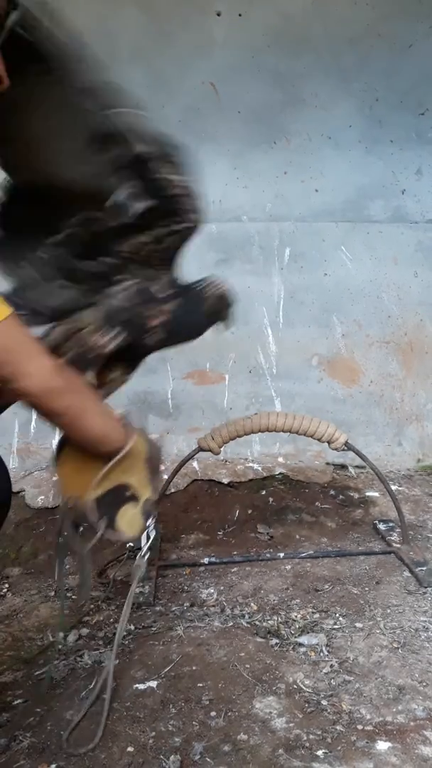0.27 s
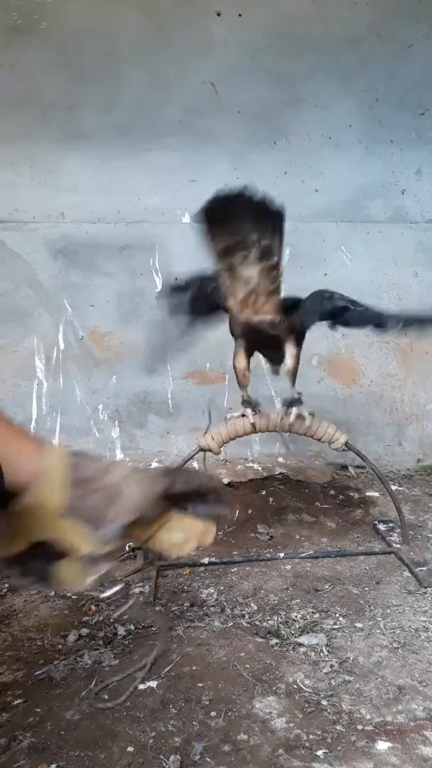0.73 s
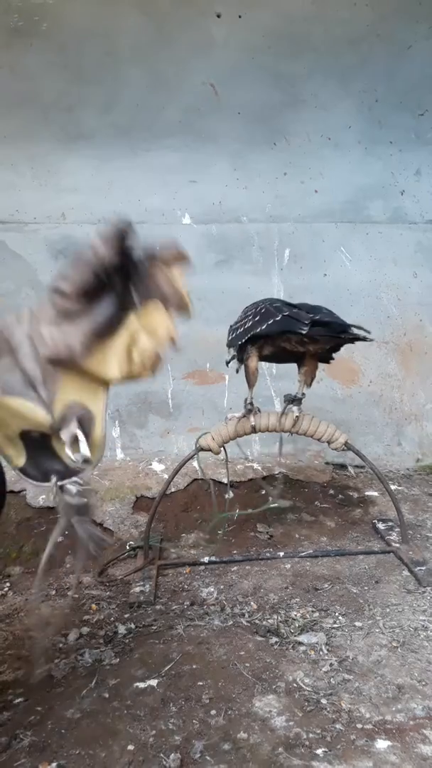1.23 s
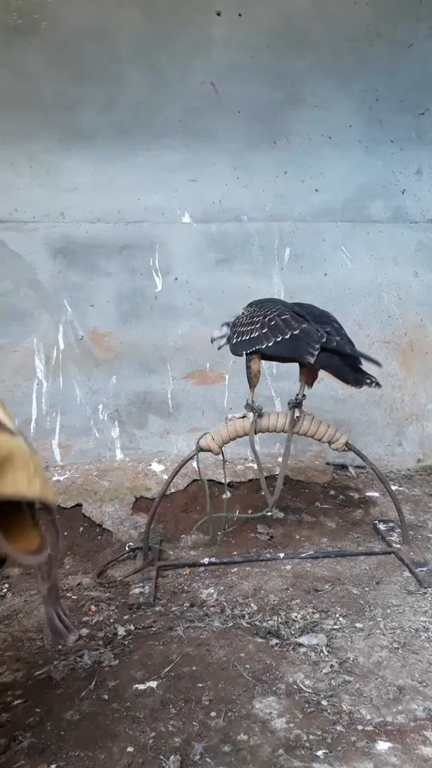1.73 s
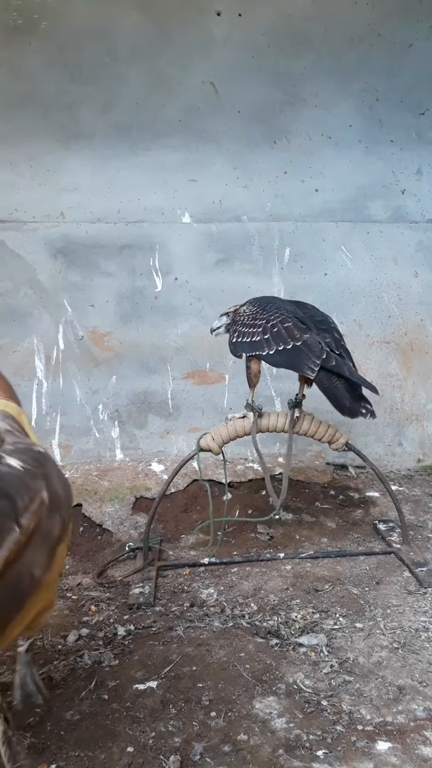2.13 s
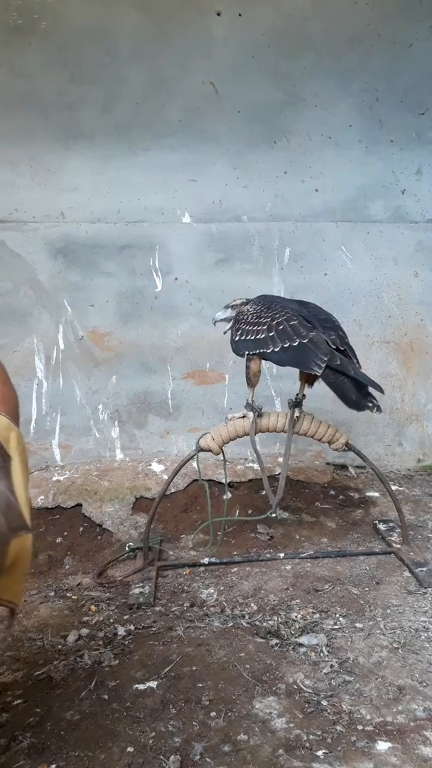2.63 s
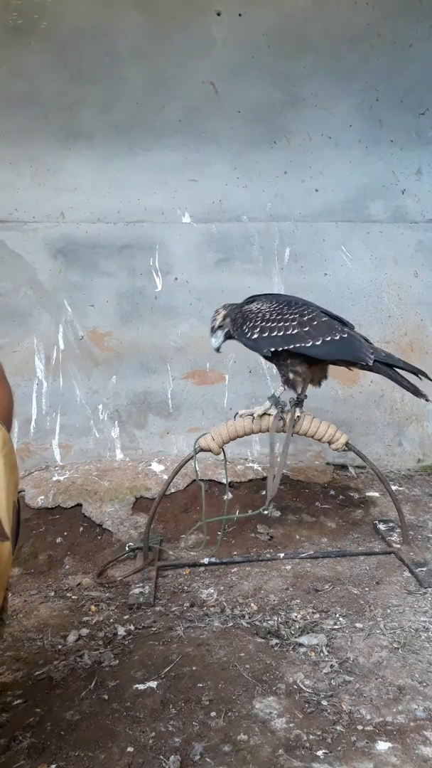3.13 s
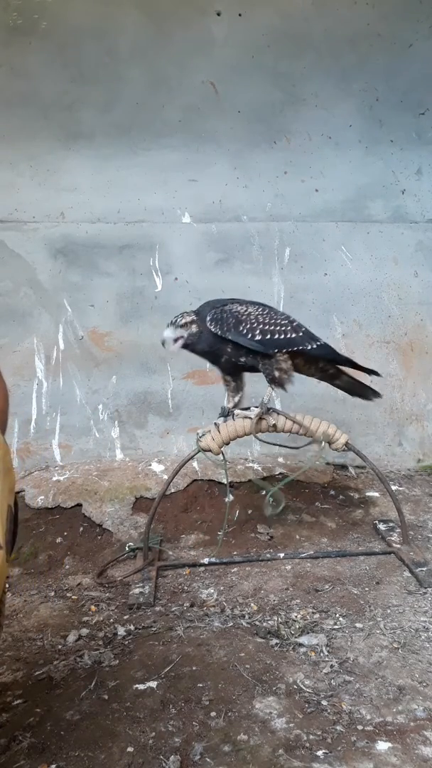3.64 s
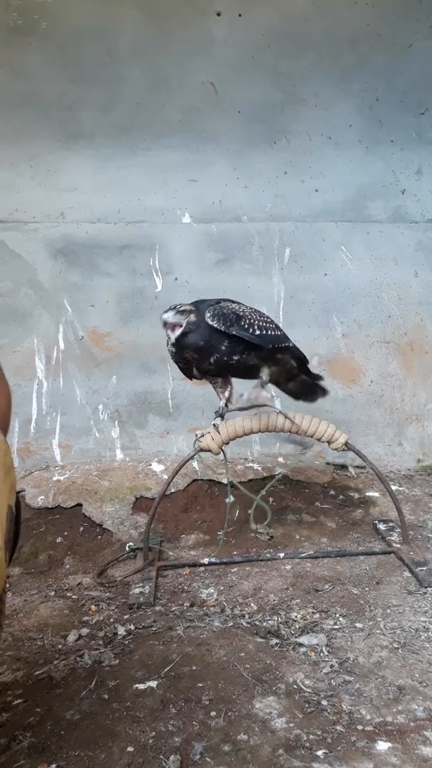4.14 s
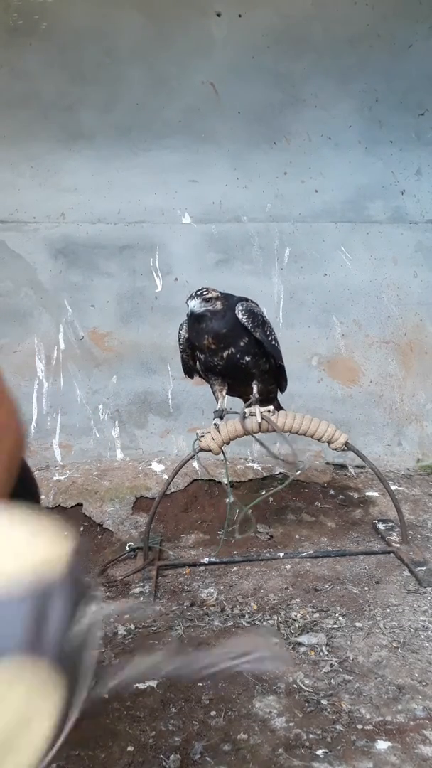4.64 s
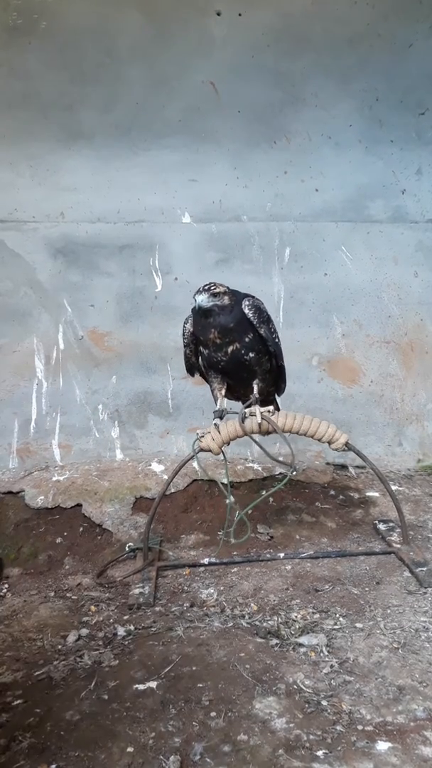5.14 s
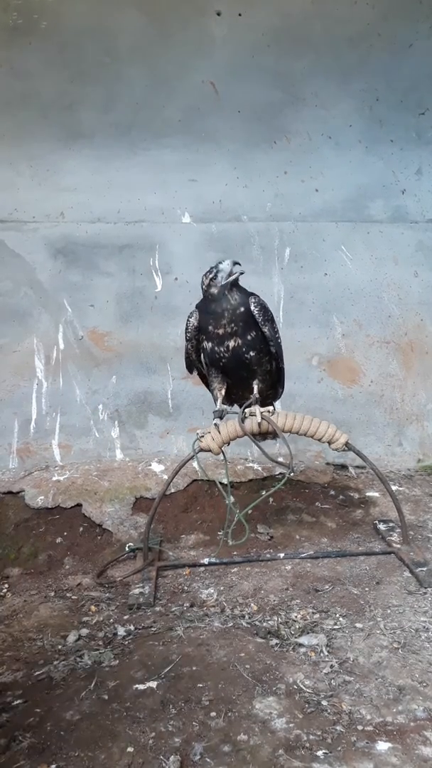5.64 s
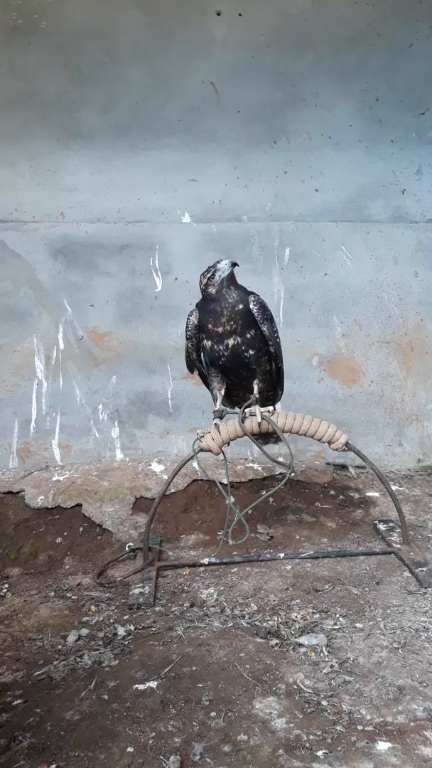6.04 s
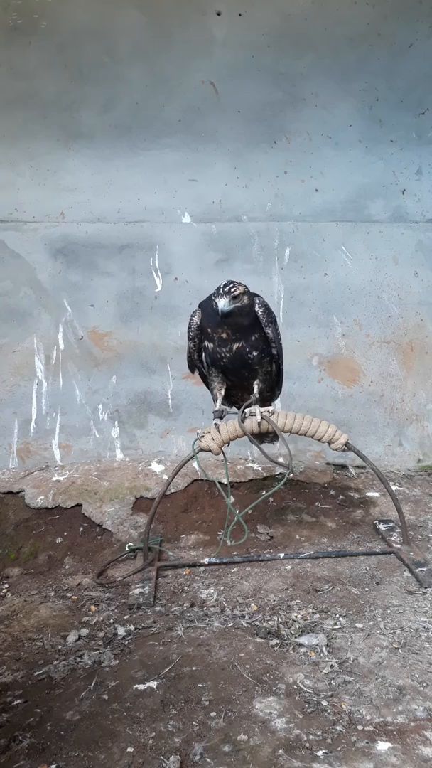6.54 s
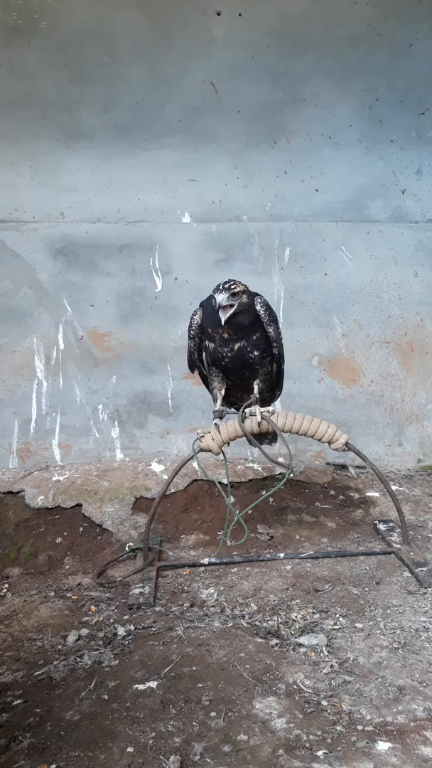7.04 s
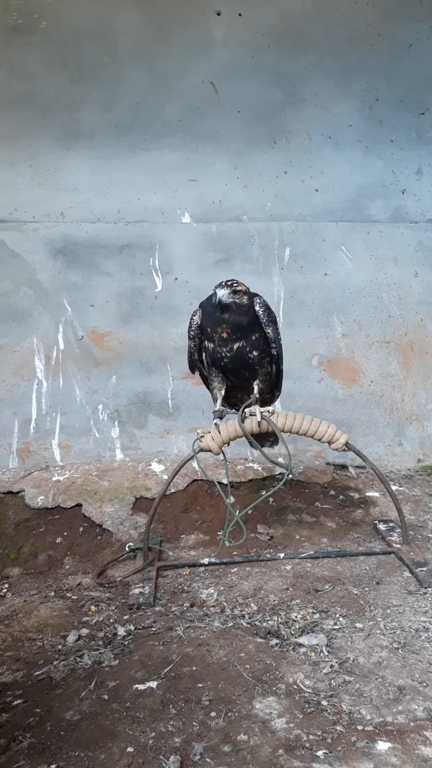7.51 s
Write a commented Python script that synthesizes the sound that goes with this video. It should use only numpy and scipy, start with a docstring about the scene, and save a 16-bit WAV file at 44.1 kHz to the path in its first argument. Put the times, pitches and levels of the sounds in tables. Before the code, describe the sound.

A young eagle begs loudly in a pen whose hard walls add a short echo, over a faint outdoor hum. Each call is a hiss with a high whistle that plunges and breaks up, then a clear, short yelp, sometimes raspy. The yelps fall at about 0.2, 0.7, 1.3, 2.0, 2.8, 3.6 and 4.2 seconds; all but the first are led by a quick rising squeak. Soft wing beats rustle from 0.3 to 1 second, then talons tick on the perch and a leash swivel jingles thinly until 1.7. Near 4.4 the bird shakes its feathers, with another faint jingle. From 4.6 to 7 seconds the handler scuffs and knocks lightly about. Two more calls with weaker hisses come at 5.7 and 7.0, the last with a low, rough undertone. A soft low rumble follows at around 7.5 seconds.

```python
"""A young eagle flaps from a glove to its perch in a walled pen, its leash jingling, and begs nine times.
Each call is a hiss whose whistle plunges and breaks up, then a clear yelp, sometimes with a low rasp.
Calls two to seven open with a rising squeak. After the seventh the bird shakes its feathers and the
handler scuffs and knocks about. The last yelp has a low, rough undertone, and a soft rumble follows.
All along, the hard walls echo over a faint outdoor hum."""
import sys
import numpy as np
from scipy import signal
from scipy.fft import rfft, irfft, next_fast_len
from scipy.io import wavfile
from scipy.ndimage import uniform_filter1d, minimum_filter1d, map_coordinates

SR = 44100
rng = np.random.default_rng(int(sys.argv[2]) if len(sys.argv) > 2 else 0)


def unload_audio(sound):
    """Save the sound as a 16-bit wav file, at the path given as the first command line argument."""
    columns = np.transpose(np.atleast_2d(sound))
    # keep every value between -1 and 1, then stretch to whole-number steps
    steps = np.round(np.clip(columns, -1, 1) * 32767)
    wavfile.write(sys.argv[1], SR, steps.astype(np.int16))


N = 342657
T = np.arange(N) / SR

# Levels in all tables are relative. A harmonic is a tone at a whole multiple of the pitch.
# the yelps: start/s, length/s, pitch/Hz, glide/(Hz per s), final sag/Hz, pitch jitter/share,
# harmonics 1 to 4/dB (four columns), climax after the start/s, climax width/s, rasp/dB, rasp length/s
YELPS = [(0.23, 0.11, 1824, -900, 30, 0.0071, -21.5, -14, -26.5, -37, .038, 0.023, -41.5, .03),
         (0.735, .11, 1780, -700, 3.5, .007, -21, -21, -32.5, -43, 0.036, .022, -45.5, 0.048),
         (1.336, 0.12, 1916, -150, 158, 0.0055, -22.5, -5, -28, -41.5, 0.048, 0.0067, -36, 0.039),
         (2.035, 0.14, 1928, 151.5, 175, 0.0028, -21.5, -5, -24, -42, 0.067, 0.012, -29, 0.055),
         (2.823, 0.14, 1866, 797, 97.5, .004, -23.5, -8.5, -28.5, -39.5, 0.041, 0.014, -24, 0.038),
         (3.613, .118, 1857, -1100, 154, 0.014, -27, -20.5, -36.5, -44, 0.029, 0.024, -25.5, 0.08),
         (4.236, .14, 1843, -400, 98, 0.0063, -25.5, -13.5, -28.5, -36, 0.045, 0.043, -25, 0.078),
         (5.716, 0.096, 1669, -1400, 38, 0.011, -17, -19, -31, -36.5, 0.054, 0.022, -26.5, 0.024),
         (7.005, 0.15, 1923, -250, 196.5, 0.0046, -24, -17, -30.5, -35, 0.1, .045, -20.5, 0.077)]
# tone colour of air rushing through the open beak: f/Hz, level/dB
BEAK = [(700, -49), (1500, -29.5), (2300, -17.5), (3000, -13), (4000, 2.5), (5500, 3.5), (6800, -0.5),
        (9000, -5), (12000, -8), (15500, -16.5)]
# tone colour of the husky noise in a forced whistle: f/Hz, level/dB
HUSK = [(2500, -34.5), (3100, -6), (4300, 13.5), (6000, -8.5), (7000, -4.5), (9000, -17), (13000, -23.5)]


def yelps(attack_s=.029, release_s=.0081, lead_s=.008, lock_s=.0143, bloom_s=.023, shimmer_db=3):
    """The bird's voice box locks onto a note that sags and dulls as effort fades; uneven cycles rasp."""
    overtones = [(5, -10.5), (6, -16), (7, -18), (8, -18), (9, -11)]  # high harmonics: multiple of the pitch, level against the fourth/dB
    rasp_tones = [(.5, -8.5), (1.5, -1), (2.5, -5.5), (3.5, -14.5), (4.5, -13.5), (5.5, -16), (6.5, -20.5),
                  (7.5, -25.5)]  # tones from an octave below upward: multiple of the pitch, level/dB
    puff_colour = [(500, -21.5), (1000, 2), (1800, 0.5), (3500, 0), (5500, -9), (8500, -12), (14000, -18.5)]  # the puff of noise as the note catches: f/Hz, level/dB
    fade_from, rasp_peak = .55, .43  # shares of the yelp's length and of the rasp's length
    out = np.zeros(N)
    for start, length, hz, glide, sag, jitter, *colour in YELPS:
        first, second, third, fourth, climax, width, rasp_db, rasp_s = colour
        t = clock(length + lead_s) - lead_s
        n, age = len(t), np.maximum(t, 0)
        fading = np.clip((t / length - fade_from) / (1 - fade_from), 0, 1) ** 1.5
        pitch = hz + glide * (t - .05) - sag * fading
        angle = phase(pitch * (1 + jitter * wobble(500, n) + .014 * fading * wobble(110, n)))
        dull_db = 27.5 * fading ** 2
        first_db = first - 5 * np.exp(-age / bloom_s)  # the lowest harmonic grows in slowly
        climax_bump = np.exp(-((t - climax) / width) ** 2 / 2)
        second_db = second - 11.5 * (1 - climax_bump) - dull_db
        upper = [(3, third), (4, fourth)] + [(k, fourth + db) for k, db in overtones]
        harmonics = [(1, first_db), (2, second_db)]
        harmonics += [(k, db - dull_db - 6.5 * np.exp(-age / lock_s)) for k, db in upper]
        clear = sum(amp(db + shimmer_db * wobble(200, n)) * np.sin(round(k) * angle)
                    for k, db in harmonics)
        loose_angle = angle + .097 * wobble(600, n)
        rasp = sum(amp(db) * np.sin(round(2 * k) / 2 * loose_angle) for k, db in rasp_tones)
        rasp *= amp(rasp_db) * swell(t + lead_s, rasp_peak * rasp_s + lead_s,
                                     (1 - rasp_peak) * rasp_s, shape=1.2)
        air = amp(second_db - 30) * noise(BEAK, n)
        puff = amp(-34) * swell(t + lead_s, rise=.01, fall=.035) * noise(puff_colour, n)
        loudness = amp(-1) * gate(t + lead_s, attack_s, release_s)
        add(out, start - lead_s, loudness * (np.sqrt(2) * (clear + rasp) + air) + puff)
    return out


def hisses(plunge_hz=4000, lowest_hz=3150, settle_s=.026, plunge_s=.025, break_s=.023):
    """Air hisses through the beak; its whistle settles, plunges and breaks into a rough scream."""
    # the hiss before each yelp: start/s, plunge time/s, hiss/dB, held whistle/dB, plunge/dB,
    # scream/dB, first pitch/Hz, held pitch/Hz
    breaths = [(0.062, 0.206, -35.5, -39, -14, -19.5, 4500, 5696),
               (0.57, 0.713, -43, -33, -16, -19.5, 3956, 5447),
               (1.213, 1.317, -41, -36, -18, -27.5, 5900, 5900),
               (1.874, 2.013, -40, -42, -17.5, -20, 6130, 6120),
               (2.698, 2.798, -40, -38.5, -19.5, -23, 6100, 5890),
               (3.503, 3.576, -41.5, -37, -20.5, -24.5, 6194, 6054),
               (4.112, 4.208, -34, -45, -16, -29.5, 6010, 6020),
               (5.482, 5.685, -57, -47, -28, -28.5, 3704, 5135),
               (6.882, 6.962, -53.5, -47, -28.5, -31, 5670, 5906)]
    scream_colour = [(500, -28), (900, -10), (1400, -2.5), (1850, 5), (2300, -11.5), (3100, 8), (4300, 14),
                     (6000, -31), (9000, -16), (11000, -49)]  # the voice breaking: f/Hz, level/dB
    attack_s, release_s, overlap_s = .012, .01197, .0189  # each hiss runs on into its yelp
    out = np.zeros(N)
    for row, yelp in zip(breaths, YELPS):
        start, plunge, hiss_db, held_db, plunge_db, scream_db, first_hz, held_hz = row
        t = clock(yelp[0] + overlap_s - start + attack_s)
        n, since = len(t), t + start - attack_s / 2 - plunge  # "since" is 0 at the plunge
        fall = np.exp(since / plunge_s)
        push = np.minimum(fall, 1)
        held = held_hz + (first_hz - held_hz) * np.exp(-t / settle_s)
        hz = np.maximum(held * (plunge_hz / held_hz) ** fall, lowest_hz)
        flow_db = np.interp(since, [since[0], 0, since[-1]], [-3, 3.5, -3])
        flow = amp(flow_db + 1.5 * wobble(70, n))
        burst = amp(plunge_db + np.minimum(750 * since, -380 * since))  # loudest at the plunge
        extra_air_db = hiss_db + 35
        rough = .065 * np.sqrt(amp(extra_air_db)) * (1 - .3 * push)  # more air roughens the whistle
        bright_db = 3 - 8 * push - .35 * extra_air_db  # less air leaves it richer in overtones
        tone = np.hypot(flow * amp(held_db), burst) * whistle(hz, rough, bright_db)
        scream = unit(noise(scream_colour, n) * amp(5 * wobble(450, n)))
        scream *= np.clip(since / break_s, 0, 1) * amp(scream_db - 4.5)
        air = flow * amp(hiss_db) * noise(BEAK, n)
        husk = burst * amp(-8) * noise(HUSK, n)
        add(out, start - attack_s / 2, gate(t, attack_s, release_s) * (air + tone + scream + husk))
    return out


def squeaks():
    """A quick upward whistle that turns husky as it rises."""
    rises = [(0.45, 0.068, 2677, 5953, -24), (1.042, .061, 2856, 6290, -30),
             (1.748, 0.062, 2894, 6260, -29.5), (2.544, 0.056, 2850, 5993, -31.5),
             (3.332, .051, 2880, 4857, -47.5), (3.945, .05, 2805, 6140, -26.5)]  # the squeaks: start/s, length/s, first pitch/Hz, last pitch/Hz, level/dB
    out = np.zeros(N)
    for start, length, first_hz, last_hz, db in rises:
        progress = np.linspace(0, 1, round(length * SR))
        hz = first_hz * (last_hz / first_hz) ** (progress ** .94)
        tone = whistle(hz, rough=.018 + .085 * progress, bright_db=-1)
        husk = 2 * progress ** 2 * amp(-2) * noise(HUSK, len(progress))
        arch = np.abs(np.sin(np.pi * progress)) ** 1.1
        add(out, start, amp(db) * arch * (tone + husk))
    return out


def whistle(hz, rough, bright_db, flutter_db=4, surge_db=2):
    """An airy whistle: swirling air frays its pitch and makes it waver."""
    n = len(hz)
    fray = rough * (wobble(1500, n) + .41 * wobble(130, n))
    angle = phase(hz * (1 + fray + .014 * wobble(70, n)))
    overtones = amp(-14) * np.sin(2 * angle) + amp(-24) * np.sin(3 * angle)
    tone = np.sin(angle) + amp(bright_db) * overtones
    return unit(tone * amp(flutter_db * wobble(500, n) + surge_db * wobble(60, n)))


def knocks(ring_s=.075, thump_hz=210, thump_s=.046, clatter_s=.19):
    """The handler steps and bumps about: a firm push, a short ring, a low thump and a spray of grit."""
    hits = [(0.349, -47, 1220, -46, -38), (4.651, -27.5, 259, -26, -33), (5.233, -22, 589, -31.5, -36),
            (5.328, -24, 429, -31, -42), (5.57, -36.5, 251, -45, -52), (5.684, -18.5, 252, -28, -44),
            (6.231, -30, 302, -46, -34), (6.343, -37, 976, -48, -42), (6.537, -18.5, 664, -54, -39),
            (6.616, -34, 294, -62, -42.5), (6.736, -27.5, 596, -39, -35.5), (6.756, -28, 596, -57, -39.5),
            (6.953, -28, 1110, -39, -33)]  # steps and knocks: t/s, ring/dB, ring pitch/Hz, thump/dB, clatter/dB
    # tone colour of the spray: f/Hz, level/dB
    grit = [(80, -48), (250, 0), (700, 9), (1550, 4), (2100, -25), (4000, -17.5), (12000, -36)]
    out, t = np.zeros(N), T[:SR // 5]
    contact = (1 - np.exp(-t / .0012)) * (1 + np.exp(-t / .005))
    for start, db, hz, thump_db, clatter_db in hits:
        ring = die_away(t, db - 5, ring_s) * np.sin(phase(hz * (1 + .031 * wobble(490, len(t)))))
        thump = die_away(t, thump_db + 1, thump_s) * np.sin(2 * np.pi * thump_hz * t)
        spray = die_away(t, clatter_db - 1, clatter_s) * noise(grit, len(t))
        add(out, start, (ring + thump + spray) * contact)
    # small things give off no deep bass
    return signal.sosfilt(signal.butter(2, 130, "highpass", fs=SR, output="sos"), out)


def scuffs_and_undertone(grain_db=3):
    """Grainy swells: soles, glove and leash drag; the last is the final yelp's low, rough undertone."""
    swells = [(.5, 0.21, 0.19, -46, 601), (1.53, .015, 0.1246, -38.5, 1284), (1.62, .06, 0.11, -46.5, 1202),
              (2.6, 0.29, 0.37, -46.5, 722.6), (4.6, 0.18, 0.85, -50, 951), (5.2, 0.031, 0.075, -36.5, 630),
              (5.285, 0.043, 0.039, -32, 450), (5.34, 0.076, 0.092, -37.5, 700),
              (6.97, 0.043, 0.14, -39, 803)]  # scuffs, then the undertone: start/s, rise/s, fall/s, level/dB, centre/Hz
    # tone colour of the broad noise: f/Hz, level/dB
    broad = [(90, -26.5), (250, 0), (700, 3.5), (1550, 4.5), (2200, -22), (3800, -11), (12000, -35.5)]
    out = np.zeros(N)
    for start, rise, fall, db, hz in swells:
        t = clock(rise + fall)
        n, angle = len(t), 2 * np.pi * hz * t
        band = wobble(600, n) * np.sin(angle) + wobble(600, n) * np.cos(angle)
        grainy = unit((band + amp(-4) * noise(broad, n)) * amp(grain_db * wobble(150, n)))
        add(out, start, amp(db - 2) * swell(t, rise, fall, shape=1.1) * grainy)
    return out


def rustles_and_ticks(grain_db=3, tick_s=.01):
    """The bright top of the first call's hiss, then sliding feathers; talons and leash swivel tick."""
    # top of the first hiss, then wing beats, last a shake: start/s, rise/s, fall/s, rustle/dB, sizzle/dB
    swells = [(0.051, .08, .17, -61.5, -45), (.34, .025, .08, -44.5, -49), (.53, .04, .07, -48, -48.5),
              (.6, .09, .19, -41.5, -49), (0.799, .1, .3, -63, -64.5), (4.38, .1, .21, -43.5, -60.5)]
    rustle_colour = [(200, 0), (600, -1), (1400, 8.5), (2100, -8), (4000, -1.5), (6500, -2), (10000, -18),
                     (15000, -16)]  # tone colour of the rustle: f/Hz, level/dB
    ticks = [(0.9339, -48), (0.9567, -27.5), (1.018, -40), (1.0544, -46), (1.6514, -44.5), (1.6784, -49),
             (2.188, -42), (3.3292, -36.5), (4.866, -47), (4.9891, -40), (5.123, -46), (5.1634, -41.5),
             (5.1885, -47.5)]  # taps of talons and swivel: t/s, level/dB
    # tone colour of sizzle and ticks: f/Hz, level/dB
    fine = [(2000, -16), (6000, -1.5), (9000, 7), (10500, -6.5), (14500, 0)]
    out = np.zeros(N)
    for start, rise, fall, rustle_db, sizzle_db in swells:
        t = clock(rise + fall)
        n = len(t)
        rush = amp(rustle_db - 1) * noise(rustle_colour, n) + amp(sizzle_db - 2) * noise(fine, n)
        grain = unit(amp(grain_db * wobble(300, n)))
        add(out, start, swell(t, rise, fall, shape=.84) * rush * grain)
    t = T[:SR // 20]
    for start, db in ticks:
        add(out, start, die_away(t, db - 8, tick_s) * noise(fine, len(t)))
    return out


def swivel(touches_per_s=14, ring_hz=14300, ring_s=.008, scatter_db=4):
    """Small steel links on the leash touch at random and ring very high and briefly."""
    jingles = [(0.901, .8, -49), (4.702, .4, -50)]  # spells of jingling: start/s, length/s, level/dB
    out, t = np.zeros(N), T[:SR // 20]
    for start, length, db in jingles:
        for when, pitch, size in rng.uniform(-1, 1, (round(touches_per_s * length), 3)):
            ring = np.sin(2 * np.pi * ring_hz * (1 + .05 * pitch) * t)
            add(out, start + length * (when + 1) / 2, die_away(t, db + scatter_db * size, ring_s) * ring)
    return out


def pen(x, walls_db, tail_db, walls_delay_s=.011, walls_fade_s=.23):
    """The near walls send back a quick cluster of echoes, then a smooth tail."""
    fade_times = [(150, 0.38), (700, 0.23), (1800, 0.76), (4000, 0.44), (5800, 0.43), (8000, 0.94),
                  (14000, 0.5)]  # how long the tail lingers: f/Hz, time for a 60 dB fall/s
    hz, t, spectrum = signal.stft(rng.standard_normal(SR), SR, nperseg=256)
    spectrum = spectrum * die_away(t, 0, along(fade_times, hz)[:, None])
    tail = signal.istft(spectrum, SR, nperseg=256)[1]
    t = T[:len(tail)]
    tail *= np.clip(t / .0067, 0, 1)
    spikes = rng.standard_normal(len(t)) ** 3  # cubing makes single echoes stand out
    walls = spikes * (t > walls_delay_s) * die_away(t, 0, walls_fade_s)
    echoes = amp(tail_db) * tail / np.linalg.norm(tail) + amp(walls_db) * walls / np.linalg.norm(walls)
    return x + signal.fftconvolve(x, echoes)[:N]


def outdoors(hum_hz=108, hum_fade_db_per_s=1.5):
    """Distant outdoor noise and a low hum that fades away; also a late soft rumble as the handler moves."""
    air = [(15, -33), (25, -20), (43, -19.5), (99, 1), (399, -5), (509, -2), (804, -5), (970, -4),
           (1850, -12), (2010, -24), (3720, -23), (4260, -24.5), (5580, -22), (10900, -35), (15500, -34.5)]  # tone colour of the distant noise: f/Hz, level/dB
    rumbles = [(7.28, 0.18, 0.18, -44), (7.601, .15, .1, -50.5)]  # swells of low rumble: start/s, rise/s, fall/s, level/dB
    # tone colour of the rumble: f/Hz, level/dB
    deep = [(20, -23), (60, -2.5), (140, 5), (260, -2.5), (600, -47.5), (2000, -90)]
    out = amp(-51 + .4 * wobble(2.2, N) + .82 * wobble(25, N)) * noise(air)
    hum_level = amp(-63 - hum_fade_db_per_s * T + 3.6 * wobble(8, N))
    out += hum_level * np.sin(phase(hum_hz * (1 + .04 * wobble(3.6, N))))
    for start, rise, fall, db in rumbles:
        t = clock(rise + fall)
        add(out, start, amp(db - 2) * swell(t, rise, fall) * noise(deep, len(t)))
    return out


def amp(db):
    """Turn decibels into a number to multiply by."""
    return 10 ** (np.asarray(db) / 20)


def die_away(t, db, seconds):
    """A level that starts at db and drops 60 dB in the given seconds."""
    return amp(db - 60 * t / seconds)


def unit(x):
    """Scale x to an average strength (rms) of 1."""
    return x / np.sqrt(np.mean(x ** 2) + 1e-20)


def along(points, hz):
    """Read between (f/Hz, value) points, with octaves evenly spaced."""
    f, v = np.transpose(points)
    return np.interp(np.log(hz + 1), np.log(f + 1), v)


def noise(colour, size=N):
    """Noise of strength 1 with the given tone colour."""
    m = next_fast_len(size)
    gain = amp(along(colour, np.fft.rfftfreq(m, 1 / SR)))
    return unit(irfft(rfft(rng.standard_normal(m)) * gain, m)[:size])


def wobble(rate, size):
    """A smooth curve through rate random points a second."""
    points = rng.standard_normal(int(size * rate / SR) + 4)
    return map_coordinates(points, [np.arange(size) * rate / SR])


def add(track, start, x):
    """Mix x into the track from start seconds on."""
    part = track[round(start * SR):][:len(x)]
    part += x[:len(part)]


def phase(hz):
    """The running angle of a wave whose pitch moves."""
    return 2 * np.pi * np.cumsum(hz) / SR


def filtered(x, gain):
    """Turn each frequency of x up or down by gain(hz)."""
    m = next_fast_len(N + SR // 2)
    return irfft(rfft(x, m) * gain(np.fft.rfftfreq(m, 1 / SR)), m)[..., :N]


def swell(t, rise, fall, shape=1):
    """A rounded rise and fall; a shape under 1 makes it fuller."""
    return np.sin(np.pi / 2 * np.interp(t, [0, rise, rise + fall], [0, 1, 0])) ** shape


def gate(t, attack, release):
    """Fade in, hold, and fade out at the end of t."""
    return np.sin(np.pi / 2 * np.clip(np.minimum(t / attack, (t[-1] - t) / release), 0, 1)) ** 2


def clock(length):
    """Sample times for length seconds."""
    return T[:round(length * SR)]


def scene():
    """Bird and handler share the echoing pen, with the outdoors behind them."""
    treble = [(6000, -1), (9300, -4.5), (10200, -21.5), (15000, -9.5)]  # the microphone softens the highest treble of the calls: f/Hz, level/dB
    voice = filtered(yelps() + hisses() + squeaks(), lambda hz: amp(along(treble, hz)))
    bird = pen(voice, walls_db=-7, tail_db=-21)
    small_sounds = knocks() + scuffs_and_undertone() + rustles_and_ticks() + swivel()
    return (bird + pen(small_sounds, walls_db=-4, tail_db=-23) + outdoors())[None]


def record(dry, ceiling=.65, low_cut_hz=45, top_hz=15850):
    """Turn down peaks above the ceiling, thin the deep bass and cut the highest treble."""
    needed = np.minimum(1, ceiling / (np.abs(dry) + 1e-9))
    gain = uniform_filter1d(minimum_filter1d(needed, size=700), size=350)
    return filtered(dry * gain, lambda hz: (hz < top_hz) * hz ** 2 / np.hypot(hz ** 2, low_cut_hz ** 2))


dry = scene()
out = record(dry)
unload_audio(out)
```